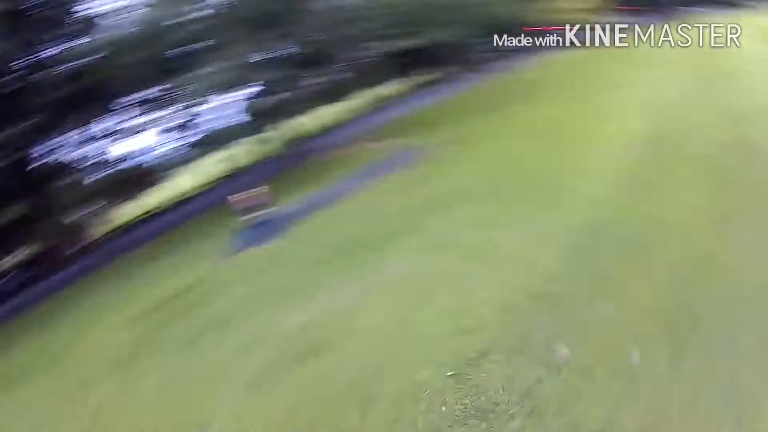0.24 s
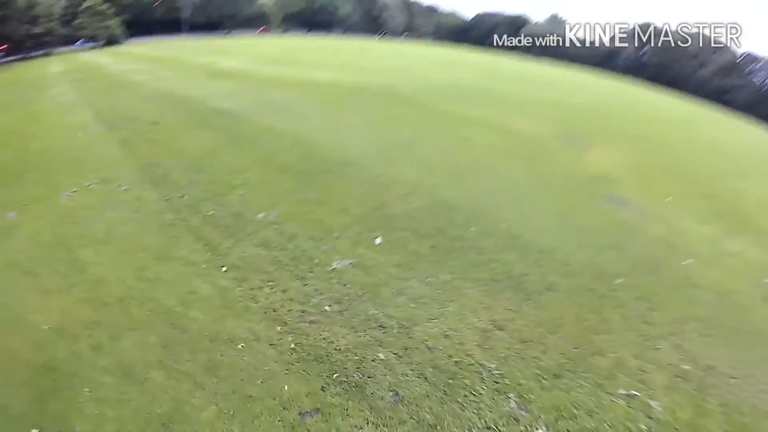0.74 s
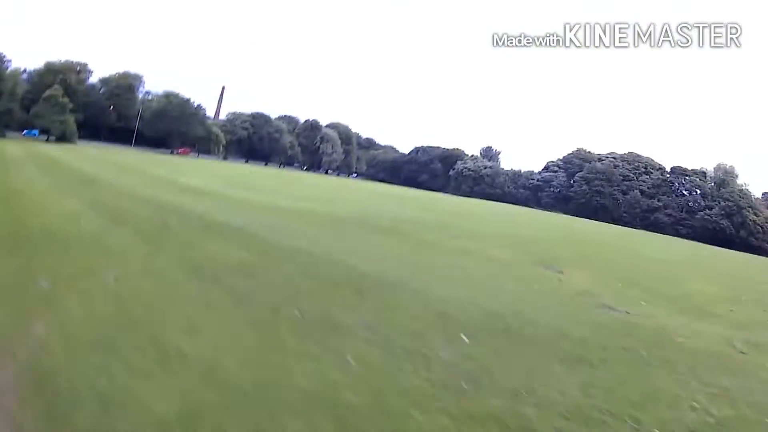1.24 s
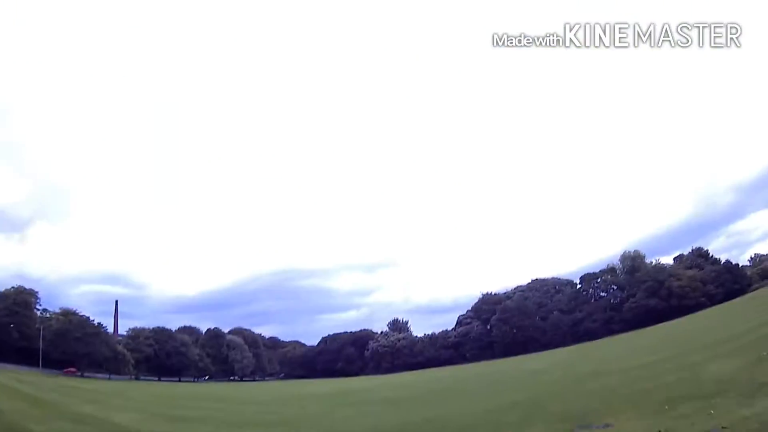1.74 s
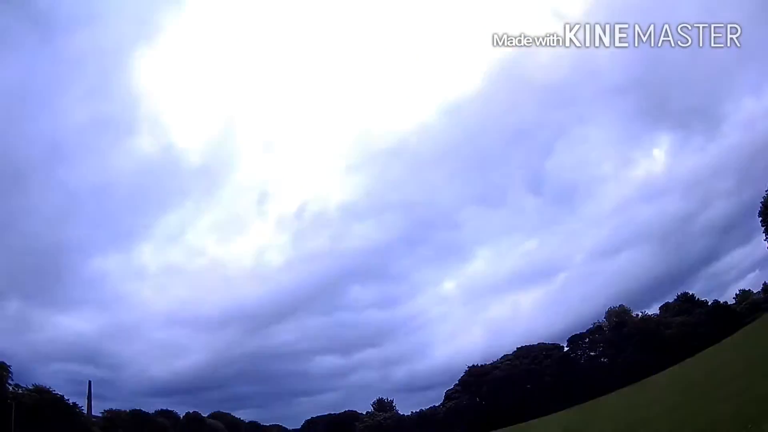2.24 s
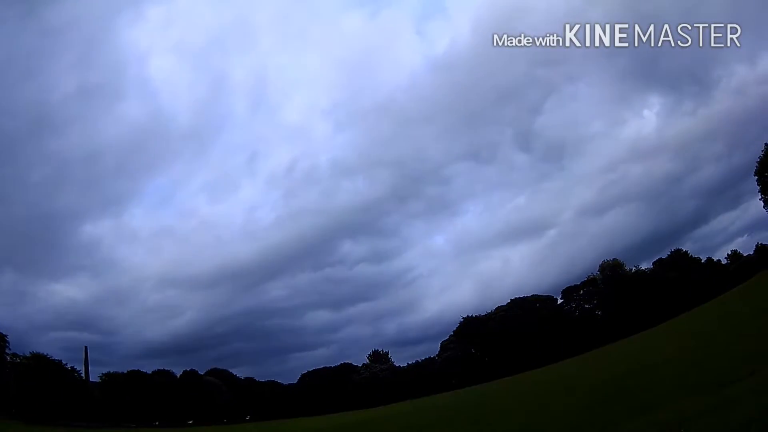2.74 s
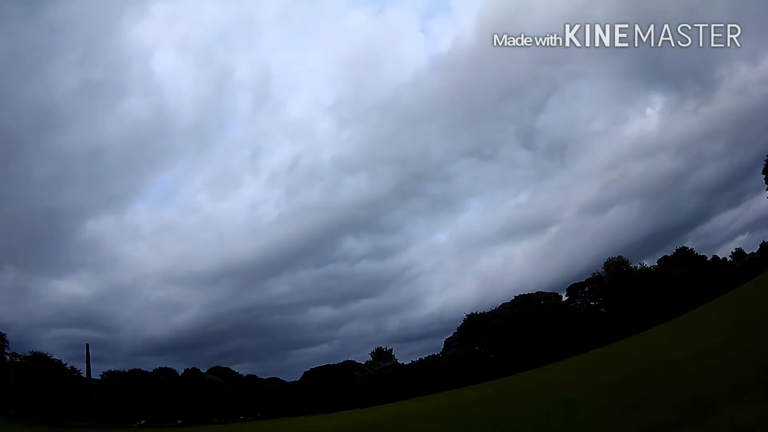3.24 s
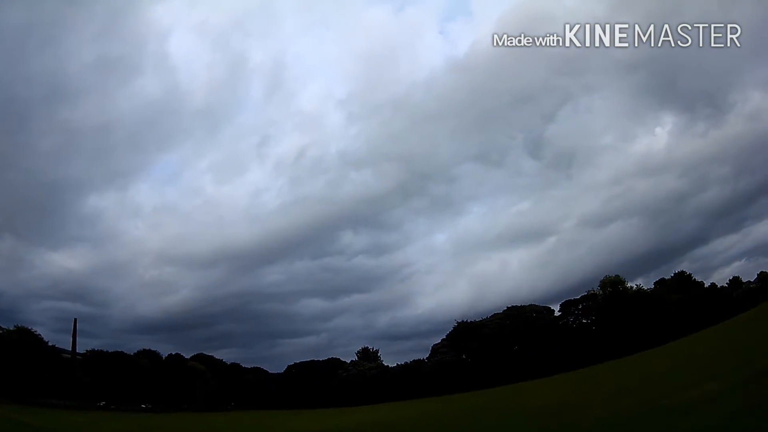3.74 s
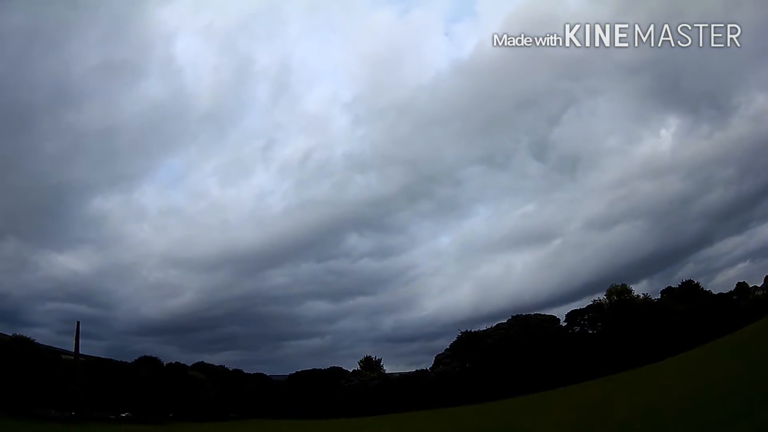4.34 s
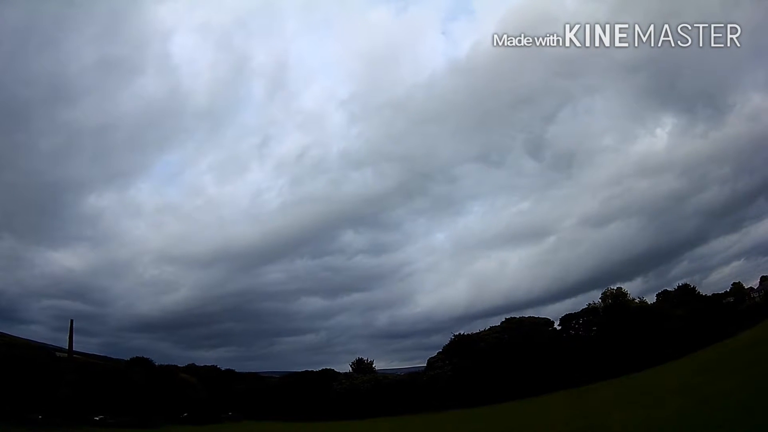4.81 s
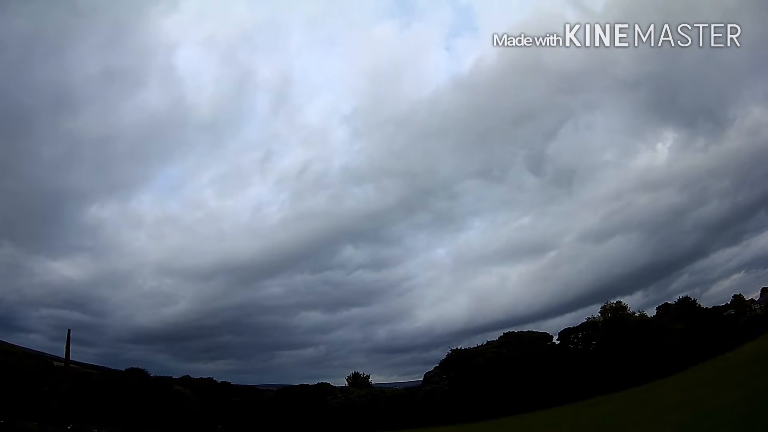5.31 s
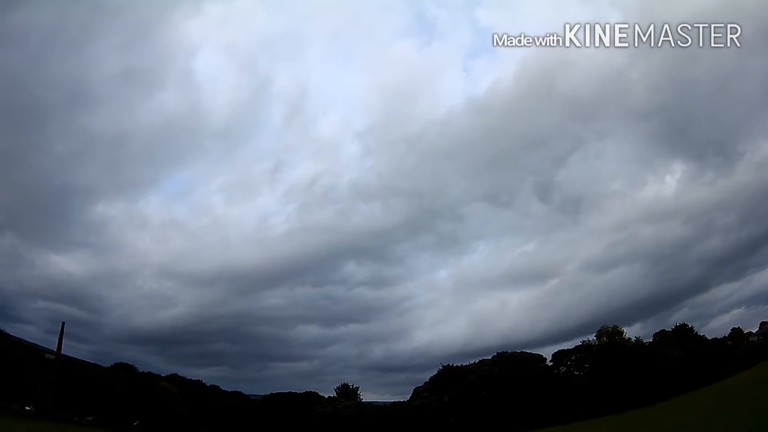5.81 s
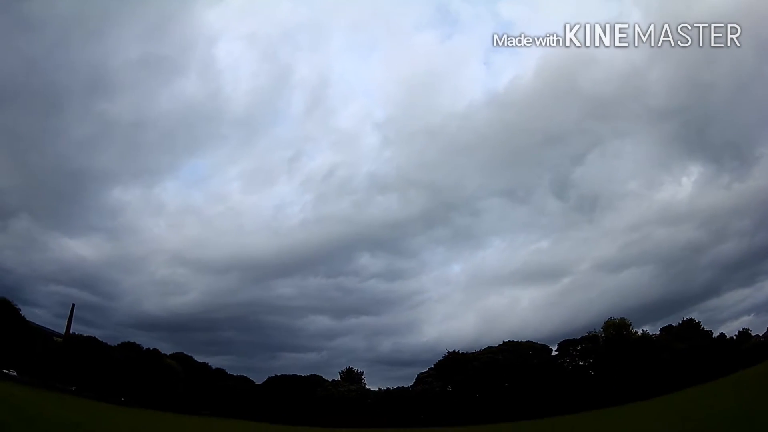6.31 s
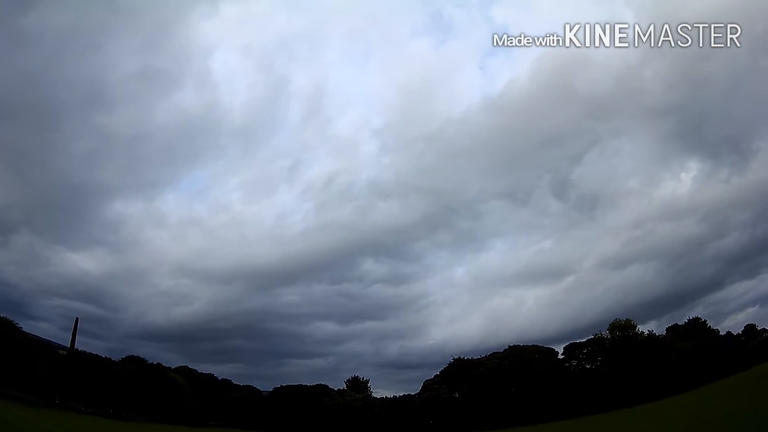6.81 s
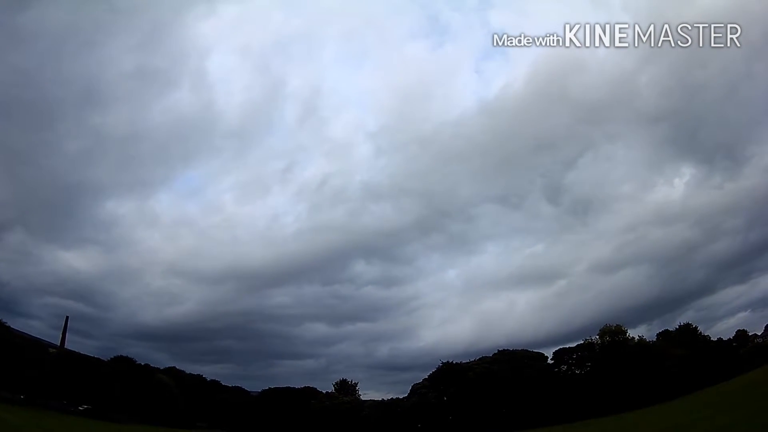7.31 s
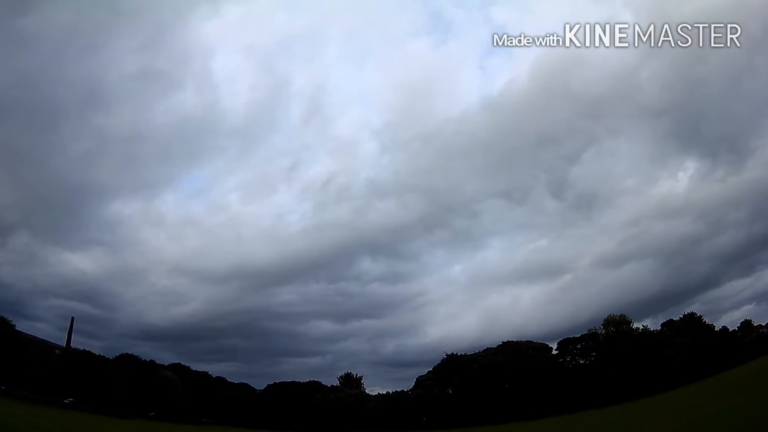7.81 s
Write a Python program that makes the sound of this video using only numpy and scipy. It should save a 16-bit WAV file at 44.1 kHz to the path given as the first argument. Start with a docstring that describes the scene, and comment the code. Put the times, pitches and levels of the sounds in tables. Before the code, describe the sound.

Heard from a microphone riding on a small drone outdoors, several propellers buzz and beat unevenly with rushing air. An early surge screams, then settles into a wavering mid-pitched whine. A second surge drops to a faint low hum, followed by three more half-second bursts, each swooping up, distorting, and sliding down with a thin motor squeal. Dull, overloaded, close sound.

```python
"""A small four-rotor drone, heard by a camera that rides on it: first a banked turn, then a climb,
then idling with throttle bursts. Each propeller sings its blade-pass tone (one cycle per passing blade)
and overtones; the motor magnets whine 14 and 28 times higher; air hisses off the blades and downwash thumps.
At full throttle the microphone overloads; a steep filter behind it dulls everything above 4 kHz."""
import sys
import numpy as np
from scipy import signal
from scipy.fft import rfft, irfft, next_fast_len
from scipy.io import wavfile
from scipy.ndimage import uniform_filter1d

SR = 44100
rng = np.random.default_rng(int(sys.argv[2]) if len(sys.argv) > 2 else 0)


def materialize(psi):
    """Save the field psi as 16-bit PCM at rate SR to the path in sys.argv[1].

    A 1-D psi becomes a single channel; in a 2-D psi each row is a channel.
    """
    bounded = np.clip(np.atleast_2d(psi).T, -1, 1)
    quanta = np.round(bounded * 32767).astype(np.int16)
    wavfile.write(sys.argv[1], SR, quanta)


N = 355446
TIME = np.arange(N) / SR  # seconds


def undb(db):
    """Turn dB into a plain gain."""
    return 10 ** (np.asarray(db) / 20)


def unit(x):
    """Scale a signal to an RMS of 1."""
    return x / np.sqrt(np.mean(x ** 2))


def curves(table):
    """Columns of a table as curves over time, corners rounded by the inertia of the rotors."""
    seconds, *columns = np.transpose(table)
    return [uniform_filter1d(np.interp(TIME, seconds, c), SR // 40, mode="nearest") for c in columns]


def on_log(hz, table):
    """Read dB off a table of (Hz, dB), straight lines between rows on a logarithmic pitch axis."""
    table_hz, table_db = np.array(table).T
    return np.interp(np.log(hz), np.log(table_hz), table_db)


def walk(rate):
    """Random curve with an RMS of 1: levels held for 1 / rate seconds, then smoothed twice."""
    hold = int(SR / rate)
    steps = np.repeat(rng.standard_normal(N // hold + 1), hold)
    smooth = uniform_filter1d(uniform_filter1d(steps, hold), hold)
    return unit(smooth[:N])


def ease(start_s, length_s):
    """Smooth step from 0 to 1."""
    return np.sin(np.pi / 2 * np.clip((TIME - start_s) / length_s, 0, 1)) ** 2


def span(start_s, end_s, fade_s):
    """Gain that fades in at the start and out at the end; a start at 0 is open at once."""
    rise = (TIME - start_s) / fade_s + (start_s == 0)
    fall = (end_s - TIME) / fade_s
    return np.clip(np.minimum(rise, fall), 0, 1)


def turns(hz, wobble):
    """Phase in radians of a rotor whose speed trembles by the share `wobble`."""
    return 2 * np.pi * (rng.random() + np.cumsum(hz * (1 + wobble * walk(60))) / SR)


FAST_GLIDE_PER_S = 5.1  # change of ln(pitch) per second that counts as a full glide


def gliding(hz):
    """How fast a pitch glides, from -1 (falling fast) to 1 (rising fast)."""
    slope = uniform_filter1d(np.gradient(np.log(hz)) * SR, SR // 40)
    return np.clip(slope / FAST_GLIDE_PER_S, -1, 1)


# Nearest rotor between the bursts, trimmed by the flight controller.
# Each row: time in seconds, blade-pass rate in Hz.
TRIM_SPEED = [(0, 477.4), (.14, 401), (.27, 297.5), (.4, 287), (.49, 346.2), (.56, 311.4), (.67, 390.5),
              (.78, 365.7), (.89, 512.2), (1.1, 417), (1.39, 429), (1.5, 409.5), (1.59, 447.3),
              (1.68, 403.5), (1.86, 460.2), (1.99, 397), (2.13, 431.6), (2.22, 384), (2.31, 441.3),
              (2.38, 387), (2.47, 414), (2.65, 435), (2.8, 488), (3.05, 165.9), (3.41, 163.4), (3.5, 210),
              (3.64, 150.9), (3.75, 149.2), (4.1, 159.4), (4.51, 159.6), (4.62, 160.4), (4.72, 157.5),
              (4.79, 139.9), (4.9, 148), (5.21, 139), (5.36, 189), (5.5, 192), (5.61, 155), (5.72, 184.6),
              (5.9, 196.8), (6.4, 133), (6.82, 133), (6.93, 143.5), (7.03, 133.3), (7.31, 133.2),
              (7.39, 178.8), (7.47, 254.4), (8.06, 270)]
# Throttle bursts. Each row: opens at (seconds), opening takes (seconds), closes at (seconds),
# closing takes (seconds), blade-pass rate aimed at when open (Hz), the same when closing starts (Hz),
# neighbour's speed as a share of the nearest rotor's once open, its share at the end,
# neighbour's level against the nearest rotor in dB, time the neighbour has faded back (seconds).
THROTTLE_BURSTS = [(.86, .085, 1.05, .29, 990, 1165, 1.03, 1.17, -3, 1.475),
                   (2.775, .177, 3.02, .325, 1075, 1090, 1.09, 1.05, -6, 3.28),
                   (3.658, .26, 4.04, .24, 1090, 1120, 1.045, 1.065, -5, 4.27),
                   (5.876, .275, 6.41, .235, 1165, 1060, 1.035, 1.085, -6, 6.62),
                   (7.455, .25, 7.94, .34, 1105, 1132, 1.07, 1.062, -5, 8.2)]
ROTOR_LAG_S = .045
FAINT_DB, FAINT_SHARE = -17.5, 1.07  # neighbour's level outside bursts, its speed share before the first
FAINT_FADE_S, SHARE_HUNT = .04, .008  # the hunt is a random drift of the share


def throttle():
    """Speed of the nearest rotor, lagging behind the stick; in a burst its faster neighbour is heard apart."""
    trim_hz, = curves(TRIM_SPEED)
    keep = np.exp(-1 / (ROTOR_LAG_S * SR))
    hz, share, twin_db = trim_hz, FAINT_SHARE, FAINT_DB
    for (opens, opening, closes, closing, open_hz, close_hz,
         first_share, last_share, apart_db, faded) in THROTTLE_BURSTS:
        opened = ease(opens, opening)
        stick = np.minimum(opened, 1 - ease(closes, closing))
        lagging_stick = signal.lfilter([1 - keep], [1, -keep], stick)
        full_hz = np.interp(TIME, [opens + opening, closes], [open_hz, close_hz])
        hz = hz + (full_hz - trim_hz) * lagging_stick

        burst_share = np.interp(TIME, [opens + opening, faded], [first_share, last_share])
        share = np.where(TIME > opens, burst_share, share)
        apart = opened - ease(faded - FAINT_FADE_S, FAINT_FADE_S)
        twin_db = twin_db + (apart_db - FAINT_DB) * apart
    share = uniform_filter1d(share, SR // 40) + SHARE_HUNT * walk(12)
    return hz, share, twin_db


# Strength of the blade tone and its overtones, before the housing colours them.
# Each row: multiple of the blade-pass rate, level in dB.
BLADE_OVERTONES = [(1, 5), (2, -1.5), (3, -2.5), (4, -7), (5, -6), (6, -12.5), (7, -27.5)]
# How the housing colours the overtones. Each row: pitch in Hz, level in dB.
HOUSING = [(100, -14), (900, -1.5), (1350, 7), (1700, 3), (2050, 0.0), (2250, -2.5), (3300, 4.5),
           (6000, -51)]


def blades(hz, wobble, flutter_db, edge_db=0):
    """Blade-pass tone and overtones; turbulence flutters the higher ones; a rotor seen edge-on is richer."""
    phase = turns(hz, wobble)
    shake_db = flutter_db / (1 + (hz / 800) ** 4)  # at full throttle the blades bite clean air
    tone = 0
    for k, db in BLADE_OVERTONES:
        lift_db = on_log(k * hz, HOUSING) - on_log(hz, HOUSING) + edge_db * (k > 1)
        dip_db = shake_db * (k - 1.0) * np.abs(walk(35))
        tone = tone + np.sqrt(2) * undb(db + lift_db - dip_db) * np.sin(k * phase + 1.263 * k * k)
    return tone


# Faster blades sing louder. Each row: blade-pass rate in Hz, tone level in dB before air and load change it.
TONE_BY_SPEED = [(130, -47.5), (200, -35.5), (300, -25), (420, -16.5), (700, -8), (900, -2), (1050, 2.5),
                 (1130, 12)]
LOAD_TONE_DB = 0.5  # louder at a full rising glide, softer at a falling one


def near_rotors(hz, share, twin_db, air_tone_db):
    """The nearest propeller and its neighbour, louder with speed and while speeding up."""
    level = undb(on_log(hz, TONE_BY_SPEED) + air_tone_db + LOAD_TONE_DB * gliding(hz))
    nearest = blades(hz, 0.003904, 4.15)
    neighbour = blades(hz * share, 0.00393, 4.7, edge_db=1.0)
    return level * (nearest + undb(twin_db) * neighbour)


# The two far rotors work harder in the turn and the climb, one table for each.
# Each row: time in seconds, blade-pass rate in Hz, tone level in dB before the overtone levels.
OUTER_ROTOR = [(0, 613, -17.5), (.1, 593, -23.5), (.3, 466, -28), (.4, 442.5, -27), (.53, 554, -24),
               (.7, 434, -26), (.85, 452, -52), (1.45, 482, -29), (1.8, 528.5, -57), (2.1, 501.6, -33),
               (2.2, 542, -31), (2.3, 485, -29.5), (2.5, 491.4, -24), (2.7, 552, -23.5), (2.8, 590, -25),
               (2.9, 800, -32)]
BANKED_ROTOR = [(0.0, 680, -17), (0.159, 648.6, -24), (0.328, 564, -23), (0.41, 441.2, -23.5),
                (0.482, 465, -18), (0.55, 465, -44)]


def far_rotors():
    """The two far propellers, heard apart at their own pitches until they fade out."""
    sound = 0
    for table in (OUTER_ROTOR, BANKED_ROTOR):
        hz, db = curves(table)
        sound = sound + span(table[0][0], table[-1][0], 0.095) * undb(db) * blades(hz, 0.00594, 3.5)
    return sound


POLES = 14  # magnet whine as a multiple of the blade-pass rate
WHINE_DB, WHINE_TOP_HZ = -41, 5800  # the whine fades above the top
SQUEAL_HZ, SQUEAL_OCTAVES = 3500, .55  # a gliding whine is loudest near a ring of the frame
SPIN_UP_DB, SPIN_DOWN_DB = 14.5, 21  # squeal at a full glide right on the ring
COASTING_ROUGH = .4  # a falling glide thickens the whine this much as a rising one


def magnets(hz, db):
    """Motor whine with its octave; in a fast glide it squeals, the motors drift apart and it thickens."""
    rate = gliding(hz)
    glide = np.maximum(rate, -COASTING_ROUGH * rate)
    ring = np.exp(-(np.log2(hz / SQUEAL_HZ) / SQUEAL_OCTAVES) ** 2)
    squeal = undb(np.maximum(SPIN_UP_DB * rate, -SPIN_DOWN_DB * rate) * ring)
    bundle = 0
    for side, side_db in ((0, -7.5), (-1.1, -8.5), (1, 3)):
        phase = turns(hz * (1 + .1 * side * glide), .002 + .025 * glide)
        octave = undb(-2) * np.sin(2 * phase) / (1 + (hz / 2450) ** 12)
        presence = glide if side else 1  # side strands sound only in a glide
        rough = undb(side_db + 7.42 * glide * walk(250))
        bundle = bundle + presence * rough * (squeal * np.sin(phase) + octave)
    return np.sqrt(2) * undb(db) * bundle / (1 + (hz / WHINE_TOP_HZ) ** 12)


# Another motor heard apart while it settles to a new speed. Each row: start in seconds, length in seconds,
# whine from (Hz), whine towards (Hz), time constant in seconds, level in dB before squeal and strand levels.
SETTLING_MOTORS = [(3.27, 0.29, 5880, 1955, 0.096, -36.5), (3.525, .17, 2808, 2010, .06, -49),
                   (3.73, 0.1, 2660, 3560, .03, -30), (4.24, 0.53, 5686, 1843, 0.077, -36.5),
                   (5.22, 0.3, 3014, 3372, 0.036, -38), (5.5, 0.118, 3330, 2550, .06, -35.5),
                   (4.948, 0.294, 2134, 3310, 0.54, -63), (5.7, .14, 2985, 2266, 0.14, -36),
                   (5.948, 0.088, 2950, 3670, 0.032, -29), (6.6, 0.66, 5600, 1895, 0.08, -37),
                   (6.92, 0.22, 2310, 1954, 0.14, -56), (7.324, 0.06, 1504, 3010, 0.067, -57)]


def settling():
    """Each motor's whine closes in on its new pitch, fast at first."""
    sound = 0
    for start, length, from_hz, to_hz, lag, db in SETTLING_MOTORS:
        hz = to_hz + (from_hz - to_hz) * np.exp(-np.maximum(TIME - start, 0) / lag)
        sound = sound + span(start, start + length, 0.028) * magnets(hz, db)
    return sound


def band(x, hz, width):
    """Resonance with gain 1 at the centre."""
    return signal.lfilter(*signal.iirpeak(hz, hz / width, SR), x)


# Rings of the camera body. Each row: centre in Hz, width in Hz, level in dB around which it wanders.
BODY_RINGS = [(800, 39, 4.5), (1385, 200, 9.5), (1998, 86, 0), (2820, 233, -11), (3420, 1200, -16)]


def airflow(hz):
    """Turbulence chopped once a blade pass, ringing the camera body, over a broad hiss."""
    chop = 1 + 0.15 * np.sin(turns(hz, 0.00444))

    def grit():
        return rng.standard_normal(N) * chop * undb(1.8 * walk(500))

    body = sum(undb(db + 2.2 * walk(12)) * band(grit(), ring_hz, width) for ring_hz, width, db in BODY_RINGS)
    broad = signal.lfilter(*signal.butter(2, [700, 4500], "band", fs=SR), grit())
    return unit(unit(body) + undb(0.5) * unit(broad))


# Hiss changes with speed. Each row: blade-pass rate in Hz, hiss level in dB before air, gusts and load.
HISS_BY_SPEED = [(135, -36), (200, -32), (300, -22.5), (420, -15.5), (700, -13.5), (1050, -14.5),
                 (1130, -6)]
GUST_DB, GUSTS_PER_S = 1.5, 9
LOAD_HISS_DB = 2  # louder at a full rising glide, softer at a falling one


def hiss(hz, air_hiss_db):
    """Air hissing off the blades, set by rotor speed, the air, gusts and load."""
    gust_db = GUST_DB * walk(GUSTS_PER_S)
    level_db = on_log(hz, HISS_BY_SPEED) + air_hiss_db + gust_db + LOAD_HISS_DB * gliding(hz)
    return undb(level_db) * airflow(hz)


def buffet():
    """Downwash thumps on the microphone: low noise of uneven strength."""
    low = signal.lfilter(*signal.butter(1, 130, fs=SR), rng.standard_normal(N))
    return unit(low * undb(3.2 * walk(11)))


# The air that the drone flies through. Each row: time in seconds, hiss in dB above its speed law,
# near rotors' tone in dB above its speed law, downwash rumble level in dB.
AIR_ALONG_THE_WAY = [(0, 3, -3, -55), (.32, 19, -6, -34), (.5, 11.5, 1, -17), (.78, 4.5, 0.5, -20),
                     (.88, 3.5, -3, -27), (1.15, 7.5, -6, -28), (1.38, 7, -3, -18), (1.5, 1, -4.5, -47),
                     (1.82, 0, -3, -68), (2.0, 6, -2, -59), (2.65, 5.5, -2.5, -30), (2.88, 6.5, -5, -13),
                     (3.2, 7.5, -0.5, -32), (3.4, 0, -8, -59), (3.9, 3, -2, -50), (4.4, 1.5, -8.5, -42),
                     (5.0, 0, -3, -74), (5.4, 4.5, -1.5, -32), (5.9, 3.5, -3.5, -37), (6.4, 6, -5, -40),
                     (6.8, 2.5, -5, -76), (7.3, 3, -4, -69), (7.6, 0.5, -1.5, -36), (8.06, 1.5, -8.5, -51)]


def scene():
    """Add up the rotors, the motor whine, the hiss and the downwash."""
    hz, share, twin_db = throttle()
    air_hiss_db, air_tone_db, buffet_db = curves(AIR_ALONG_THE_WAY)
    sound = near_rotors(hz, share, twin_db, air_tone_db)
    sound += far_rotors()
    sound += magnets(POLES * hz, WHINE_DB)
    sound += settling()
    sound += hiss(hz, air_hiss_db)
    sound += undb(buffet_db) * buffet()
    return sound[None]


def knee(x, top, order):
    """Clipping with a round knee, the shorter the higher the order."""
    return x / (1 + (x / top) ** order) ** (1 / order)


# Filter after the overloaded stage. Each row: pitch in Hz, gain in dB.
MICROPHONE_FILTER = [(20, -8.5), (100, -6.5), (300, -5.5), (1200, -2.37), (2300, 4), (3450, 1.5),
                     (3800, -4.5), (4600, -12), (5600, -23.5), (6000, -38.5), (7000, -29), (7700, -36),
                     (8000, -76), (8300, -29), (10500, -12), (13000, -14), (15400, -16)]
CLIP, CEILING = .56, .98  # largest swing of the microphone stage and of the converter
TOP_HZ = 15450  # a steep low-pass removes what lies above


def record(dry):
    """The microphone stage clips, a filter without delay follows, and the converter has its own ceiling."""
    size = next_fast_len(N + SR // 10)
    bin_hz = np.maximum(np.arange(size // 2 + 1) * SR / size, 1)
    gain = undb(on_log(bin_hz, MICROPHONE_FILTER))
    overloaded = knee(dry, CLIP, order=8)
    filtered = irfft(rfft(overloaded, size) * gain, size)[:, :N]
    out = knee(filtered, CEILING, order=24)
    return signal.sosfilt(signal.ellip(8, .2, 70, TOP_HZ, fs=SR, output="sos"), out)


dry = scene()
out = record(dry)
materialize(out)
```